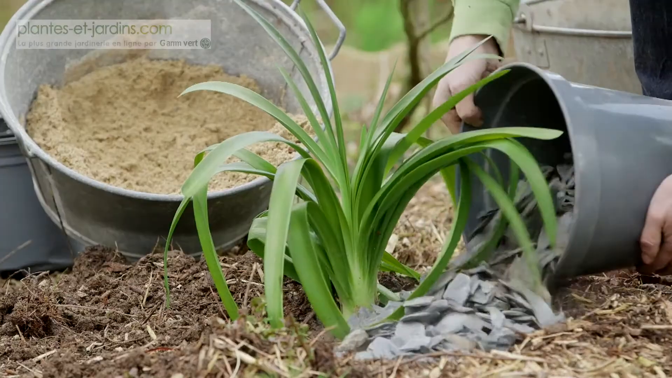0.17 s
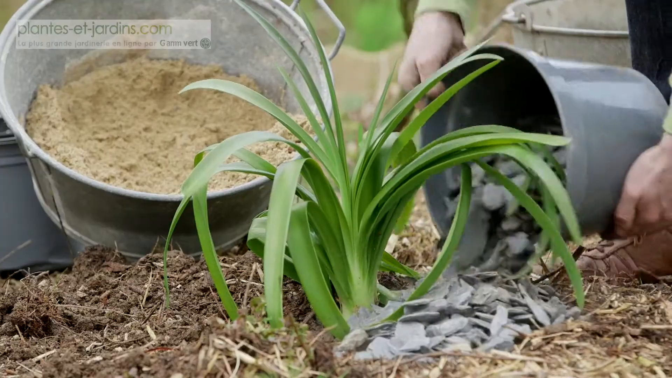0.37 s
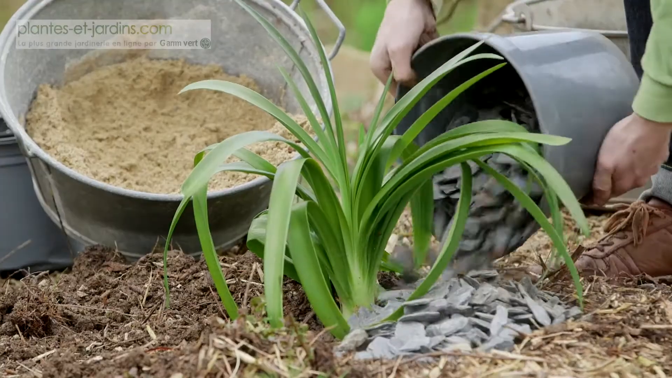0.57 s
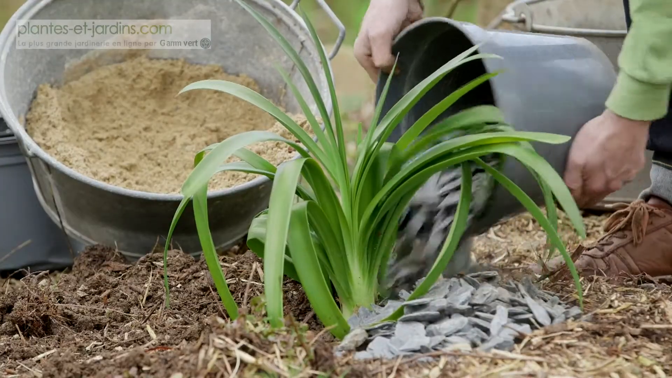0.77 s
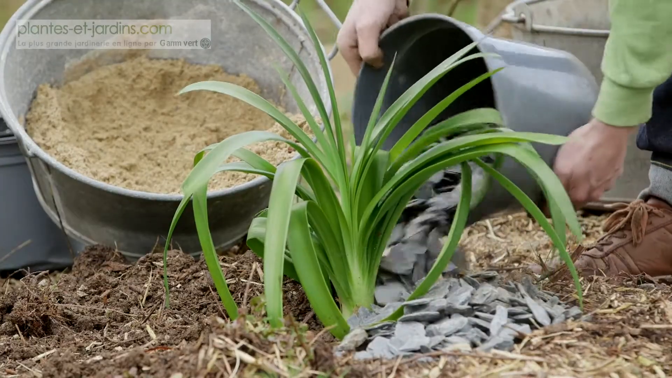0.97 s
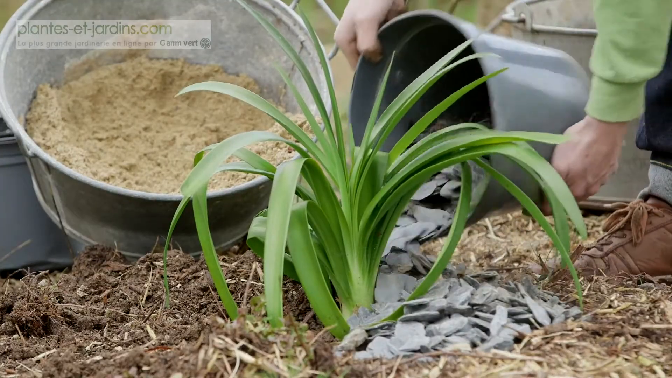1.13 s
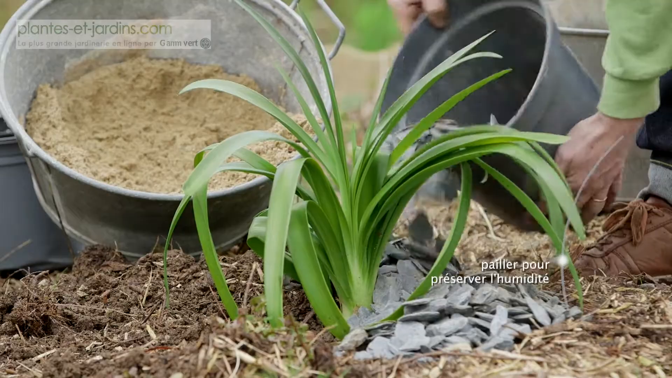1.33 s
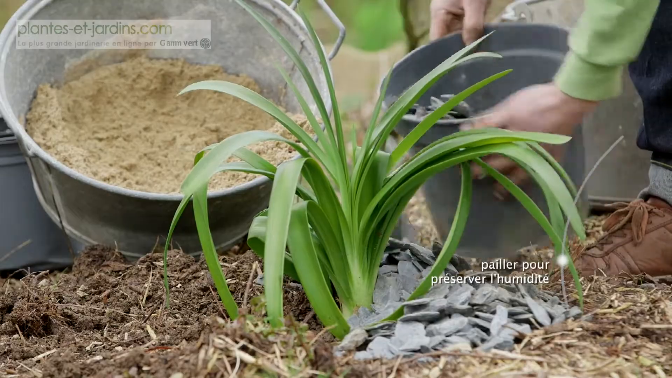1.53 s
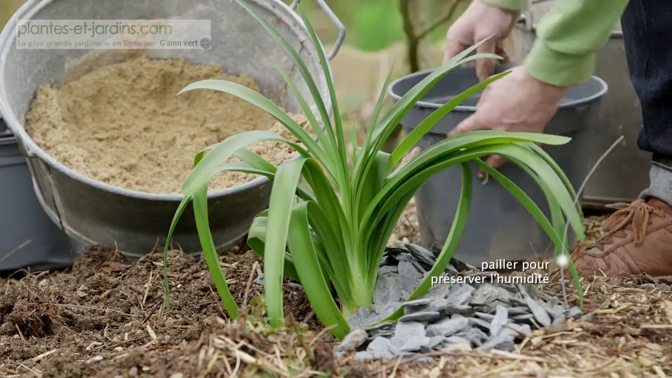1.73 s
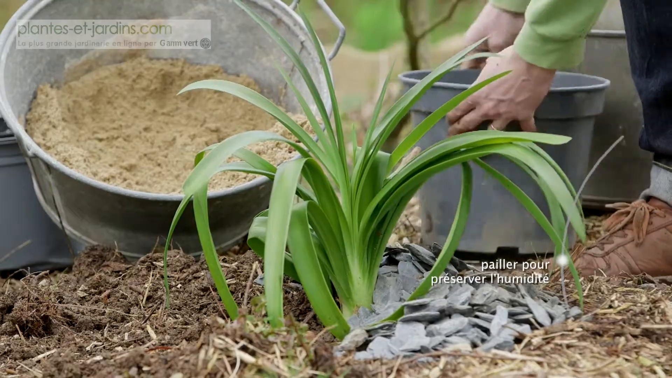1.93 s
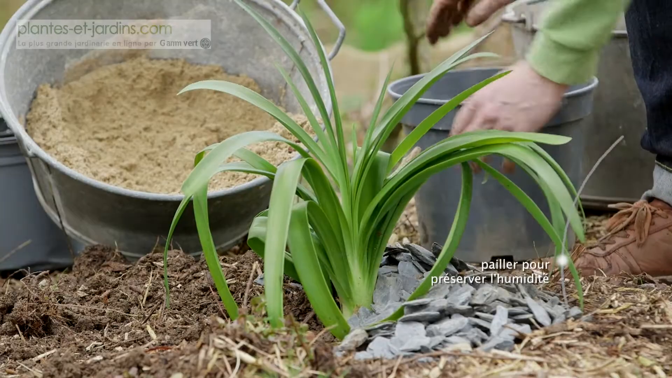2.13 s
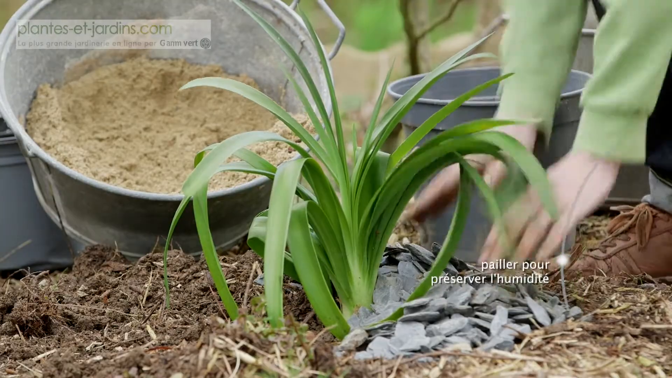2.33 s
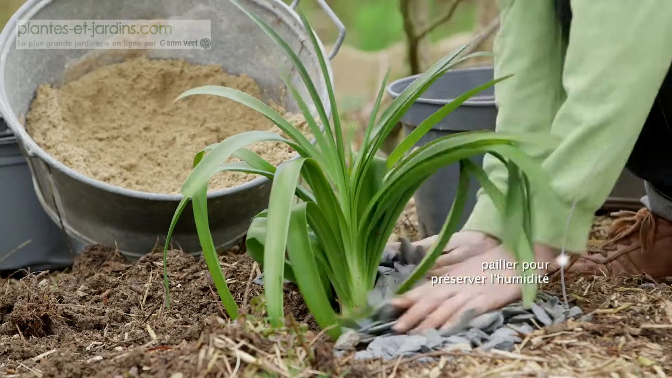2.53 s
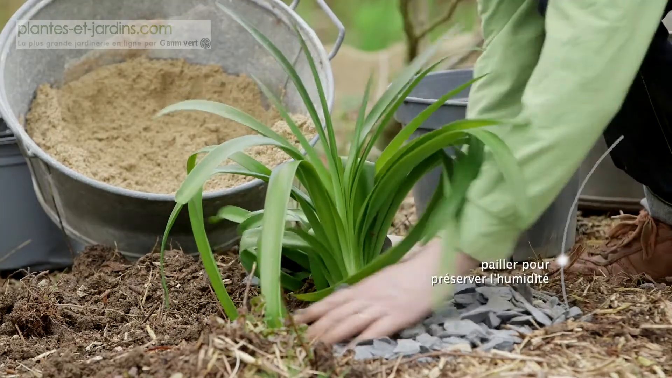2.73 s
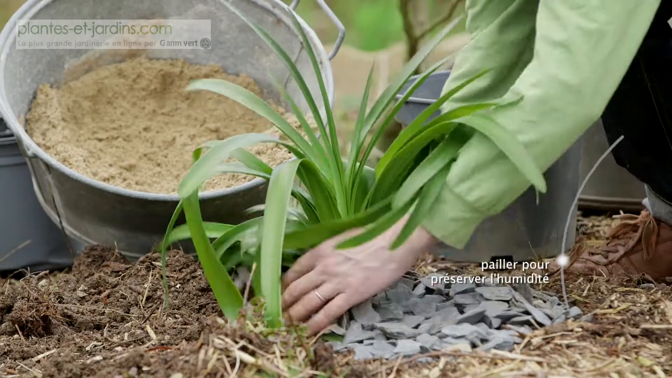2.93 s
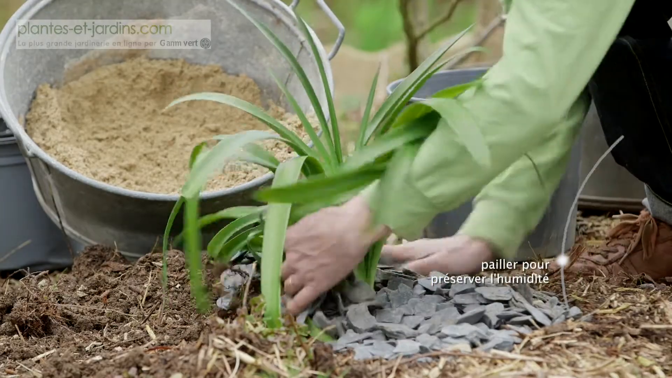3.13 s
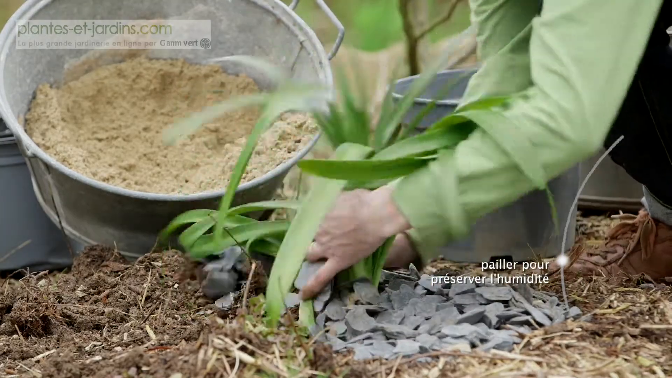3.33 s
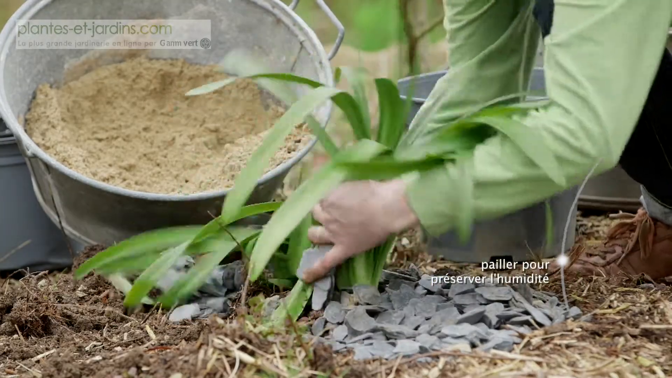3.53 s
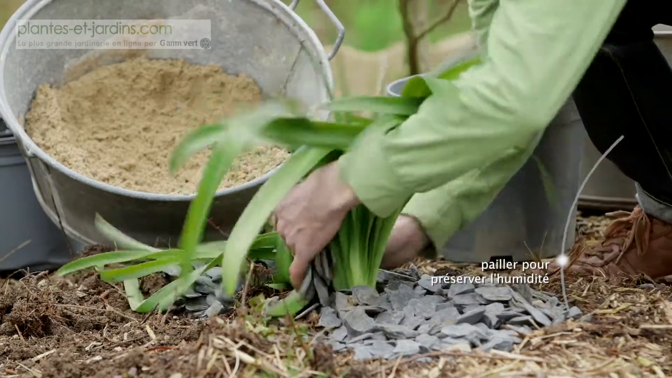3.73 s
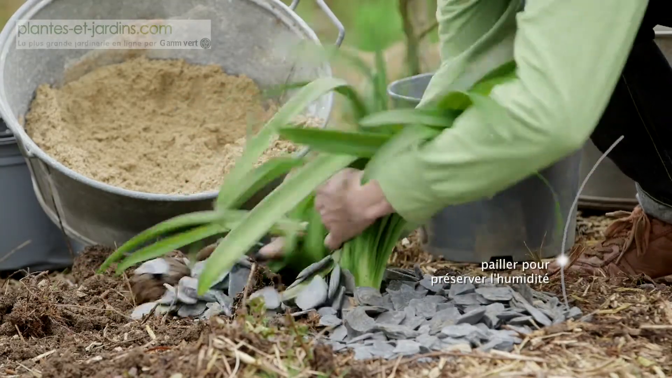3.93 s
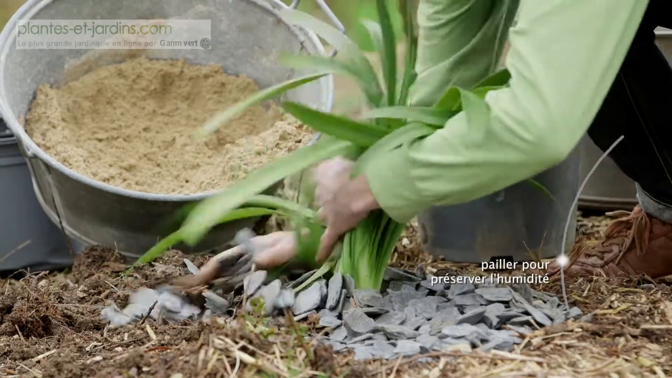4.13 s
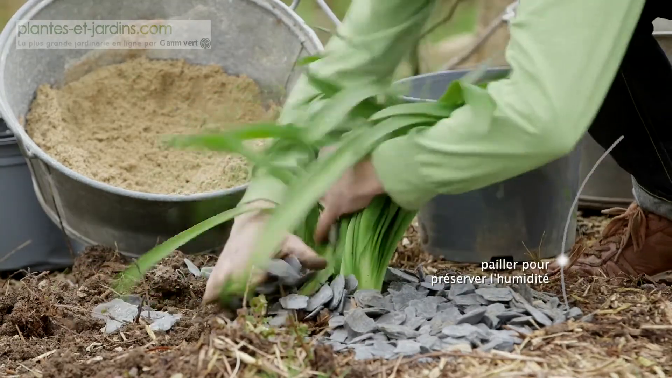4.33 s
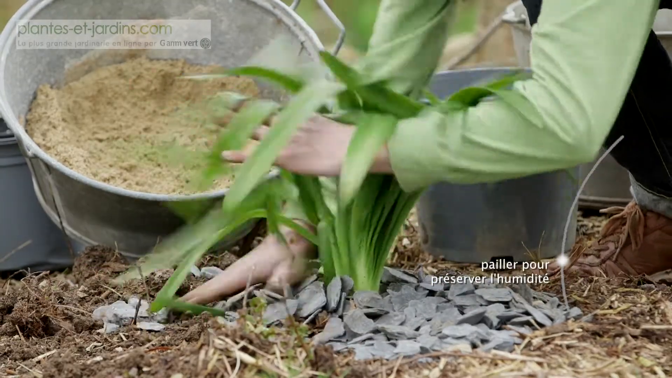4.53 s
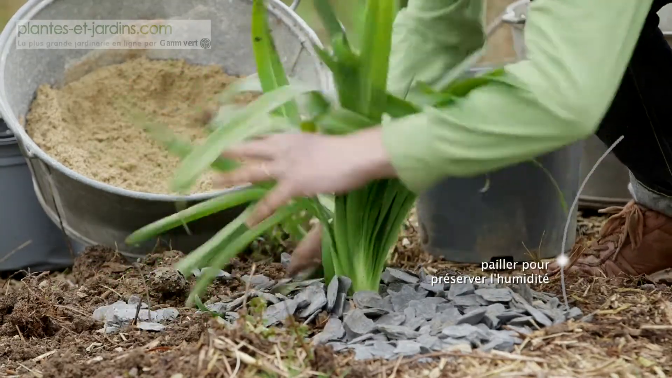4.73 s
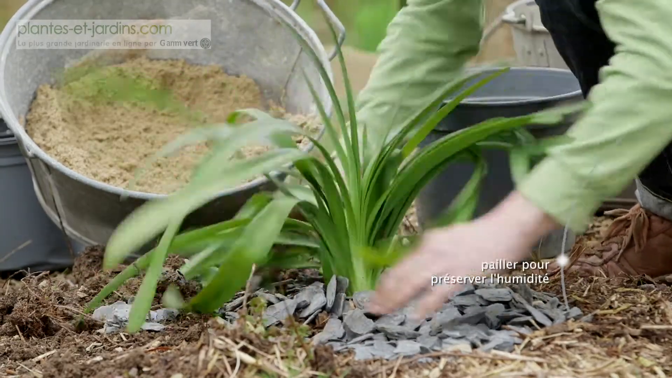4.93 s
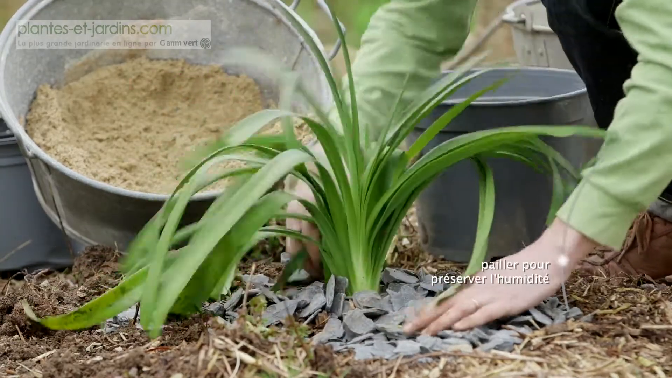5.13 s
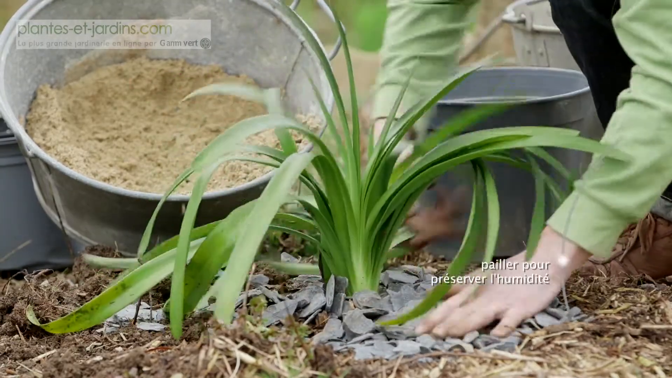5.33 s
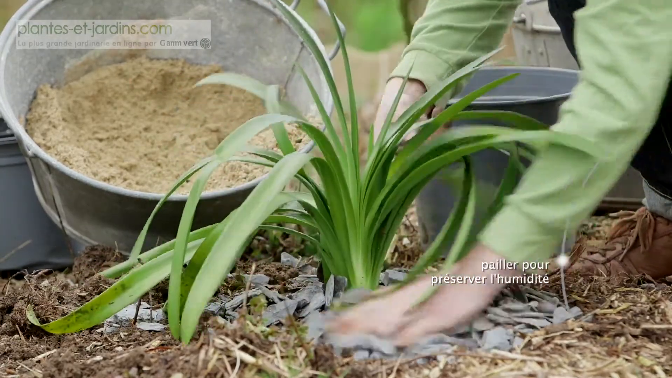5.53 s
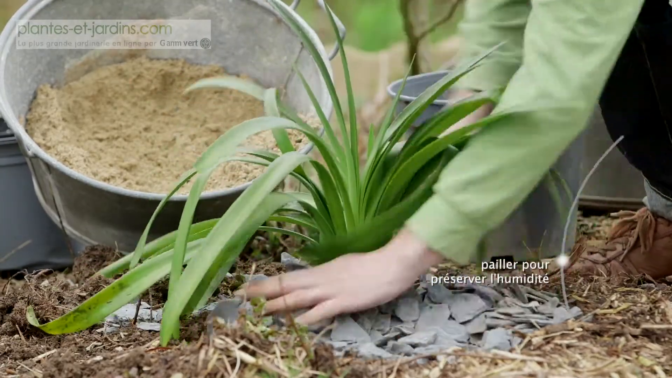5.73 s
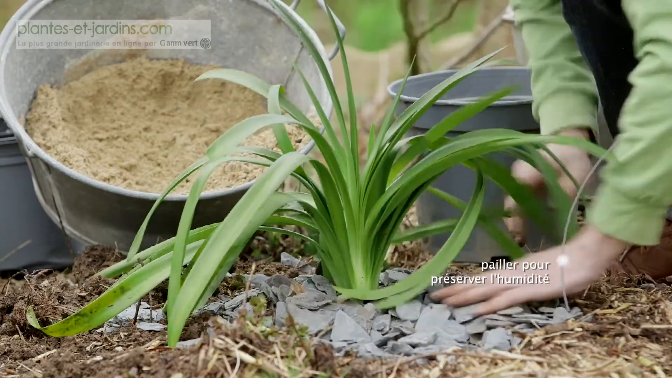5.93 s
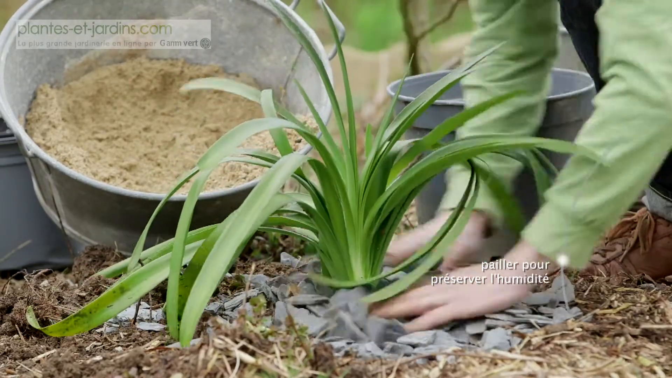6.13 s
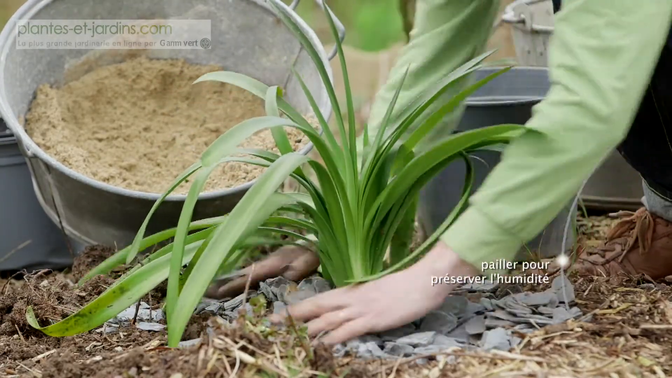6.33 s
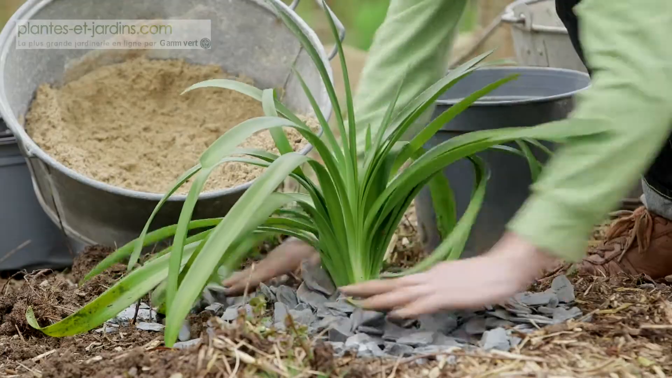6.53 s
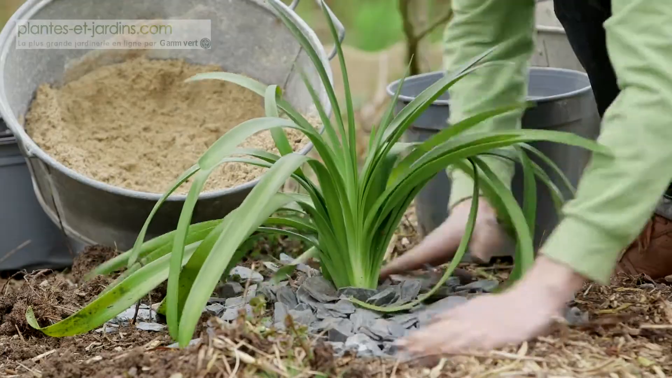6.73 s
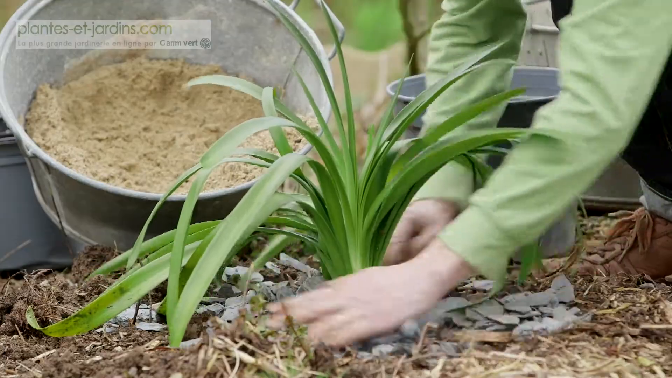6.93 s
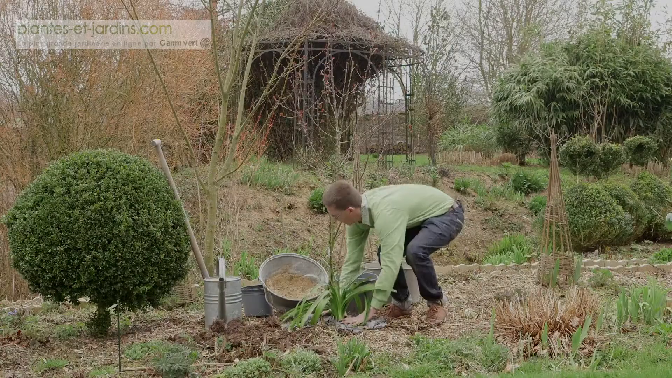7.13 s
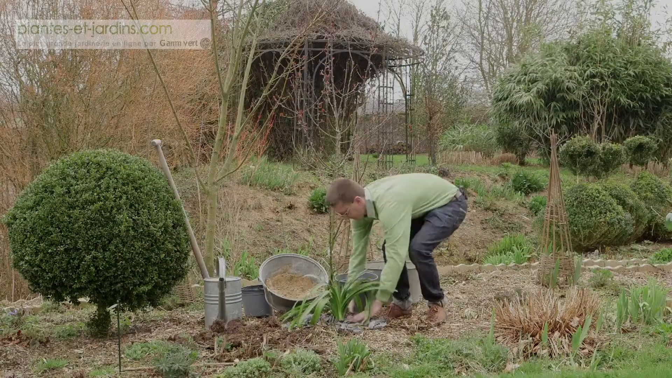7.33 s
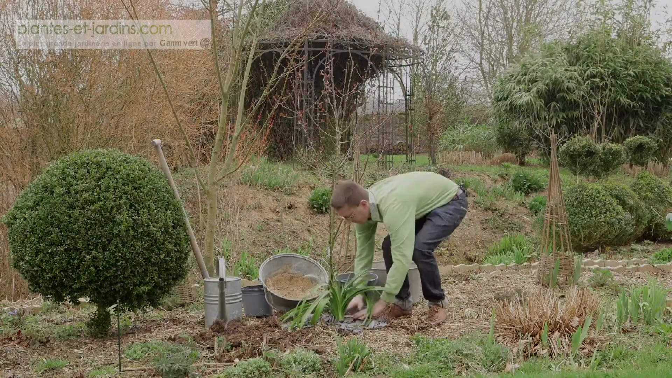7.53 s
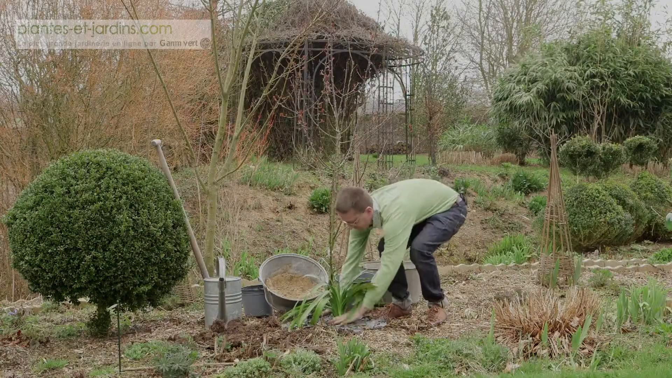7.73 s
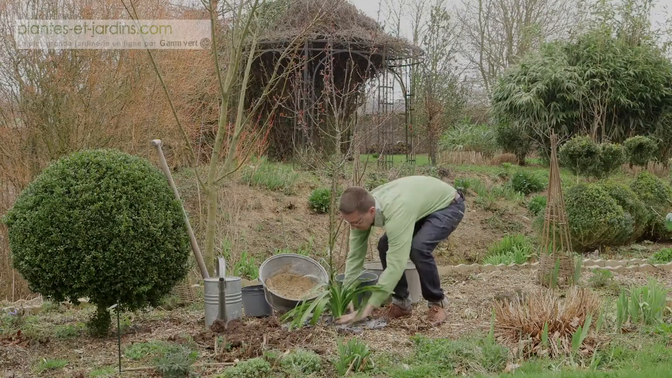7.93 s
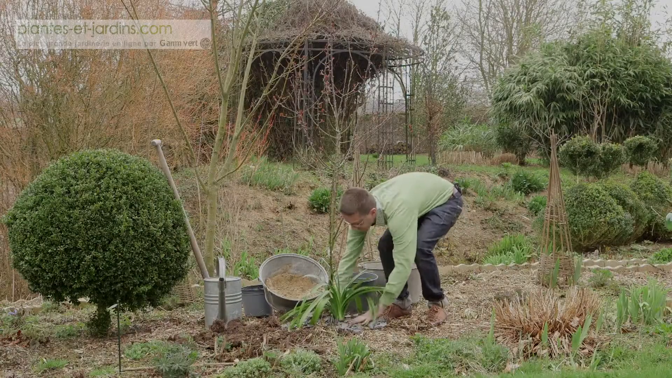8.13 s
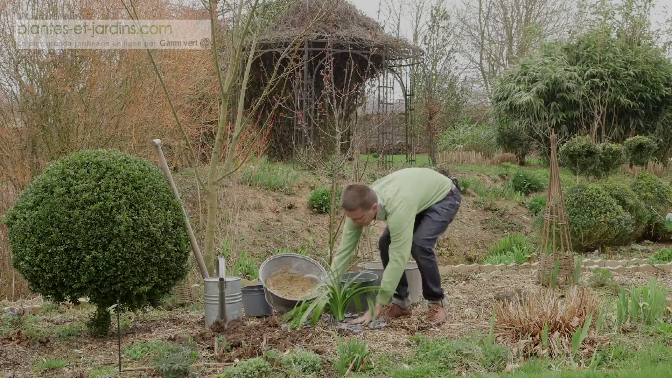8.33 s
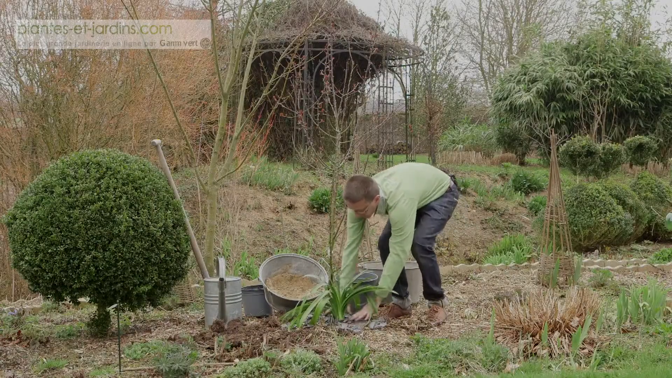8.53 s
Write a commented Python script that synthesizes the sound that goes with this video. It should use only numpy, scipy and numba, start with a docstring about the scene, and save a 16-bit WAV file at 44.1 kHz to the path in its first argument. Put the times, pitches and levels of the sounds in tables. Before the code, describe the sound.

Slate chips slide out of a plastic bucket in quick shakes, drumming on its wall and clattering onto a heap on the soil. The last ones rattle back with hollow knocks as the bucket is set down. Hands then sweep and pat the chips in short, uneven strokes, with gritty scrapes, thin clinks and soft thuds. It is all heard close up in quiet outdoor air, without echo.

```python
"""Slate chips slide out of a plastic bucket onto garden soil, drumming on its wall and clattering on
the heap; the last ones rattle back as it is set down. Two hands then sweep and pat the chips round a
plant: grit scrapes, flakes click and ring, the ground thuds. Random impacts drive the bucket's modes;
chip collisions are noise cracks plus decaying sines. Heard close up in quiet open air, with no room."""
import sys
import numpy as np
from scipy import signal
from scipy.fft import rfft, irfft
from scipy.io import wavfile
from scipy.ndimage import uniform_filter1d
from numba import njit

SR = 44100
rng = np.random.default_rng(int(sys.argv[2]) if len(sys.argv) > 2 else 0)


def generate_wav(sig):
    """Save sig (samples, or channels by samples) to the path in sys.argv[1] as 16-bit PCM at SR."""
    pcm = np.round(np.clip(np.atleast_2d(sig).T, -1, 1) * 32767).astype(np.int16)
    wavfile.write(sys.argv[1], SR, pcm)


N = 382523
T = np.arange(N) / SR
UPRIGHT_S = 1.55  # bucket goes from tipped to upright

# Modes of the tipped bucket. Each row: centre in Hz, width in Hz, gain in dB.
TIPPED_MODES = [(483, 86, 3.5), (355, 43, -13), (600, 220, 1.5), (943, 99, 9.5), (1150, 150, -4.5),
                (1380, 54, 4.5), (1830, 300, -32)]
# Modes of the upright bucket, struck on its floor. Each row: centre in Hz, width in Hz, gain in dB.
UPRIGHT_MODES = [(481, 68, 5), (785, 380, -5), (1050, 320, 1.5), (1400, 440, -1), (1750, 120, -14),
                 (2420, 880, -16)]


def pour():
    """Chips drum on the bucket and clatter onto the heap, where hard landings tick and clink."""
    # One batch per shake. Each row: start in s, length in s, settling t60 in s, drum in dB, chips in dB.
    slides = [(-0.03, 0.11, 0.84, -24.5, -22.5), (0.114, 0.16, 0.61, -27.5, -32.5),
              (0.317, 0.04, 0.092, -25, -31.5), (0.427, 0.029, 0.4, -30.5, -32),
              (0.523, 0.067, 0.54, -24.5, -36.5), (0.591, 0.089, 0.52, -20, -32.5),
              (0.724, 0.13, 0.13, -25.5, -31.5), (0.838, .15, 0.5, -26.5, -26.5),
              (1.029, 0.11, 0.51, -29, -35), (1.117, 0.069, 0.5, -22.5, -26.5),
              (1.239, 0.11, 0.38, -27, -29.5), (1.367, .06, .4, -52, -29), (1.431, 0.064, 0.31, -51, -29.5),
              (1.581, 0.05, 0.56, -27.5, -29), (1.652, 0.044, 0.062, -23.5, -25),
              (1.708, 0.068, .3, -29, -26), (1.768, 0.12, 0.46, -22.5, -19), (1.98, 0.12, 0.41, -61, -37.5),
              (2.247, 0.043, 1, -52.5, -49)]
    # Spectrum of falling chips. Each row: frequency in Hz, gain in dB.
    pour_eq = [(60, -9), (200, 0.5), (800, 9.5), (2500, 2.5), (4500, 0.5), (7000, -0.5), (11500, -5),
               (13500, -9), (16000, -19)]
    start_s, length_s, settle_s, drum_db, chips_db = np.transpose(slides)
    powers = np.array([motion(s, held_s, attack_s=.038, t60_s=t60_s) ** 2
                       for s, held_s, t60_s in zip(start_s, length_s, settle_s)])
    force = contacts(per_s=450, spread_db=-1.5)
    drum = steady(np.where(T < UPRIGHT_S, bucket(force, TIPPED_MODES), bucket(force, UPRIGHT_MODES)))
    rush = clatter(pour_eq, per_s=710, spread_db=2.5, crack_t60_s=.025, ring_s=.016, ring_db=-7)
    ticks = clatter(pour_eq, per_s=130, spread_db=2.5, crack_t60_s=.008, ring_s=.012, ring_db=-2)
    flakes = clinks(per_s=110, low_hz=3000, high_hz=12600, mean_t60_s=.028)
    chips = .75 * steady(rush) + .55 * steady(ticks) + .33 * steady(flakes, size=9000)
    return drum * overlap(powers, drum_db) + chips * overlap(powers, chips_db)


def knocks():
    """Heavy chips land on the bucket and chatter briefly."""
    # Each row: start in s, peak in dB.
    landings = [(0.144, -10.5), (0.256, -17), (0.274, -13), (0.363, -13), (0.408, -10.5), (0.43, -16.5),
                (0.556, -17), (0.643, -10), (0.703, -13), (0.762, -10), (0.835, -8.5), (0.974, -11),
                (1.053, -20), (1.168, -14), (1.183, -14), (1.337, -19), (1.577, -9.5), (1.637, -9.5),
                (1.643, -13), (1.684, -12), (1.698, -10.5), (1.723, -11.5), (1.75, -9), (1.795, -5),
                (1.864, -11), (1.882, -6), (2.1, -36), (2.125, -19.5), (2.18, -32)]
    out = np.zeros(N)
    chatter = fade(t60_s=.02)
    for start_s, peak_db in landings:
        modes = TIPPED_MODES if start_s < UPRIGHT_S else UPRIGHT_MODES
        add(out, start_s, bucket(chatter * rng.standard_normal(len(chatter)), modes), peak_db)
    return out


def bucket(force, modes):
    """The plastic wall and the air inside resonate under a force."""
    body = sum(undb(db) * resonate(force, hz, width_hz) for hz, width_hz, db in modes)
    return cut(cut(body, 276, "high"), 2430, "low")


def sweep():
    """Hands drag the chips over gritty soil and jostle them against each other."""
    # Hand strokes. Each row: start in s, length in s, grit in dB, chips in dB, soil in dB re grit.
    strokes = [(2.422, .11, -35.5, -34.5, -15), (2.528, 0.27, -34.5, -33.5, -12.5),
               (2.803, 0.084, -36, -34.5, -13), (2.89, 0.23, -44, -37.5, -6.5),
               (3.09, 0.11, -42.5, -34, -12), (3.191, 0.097, -34.5, -29, -9.5),
               (3.308, 0.18, -42, -42.5, -4), (3.5, 0.25, -46.5, -38, -5.5),
               (3.787, 0.25, -43.5, -40.5, -5.5), (4.051, 0.14, -44.5, -39, -4.5),
               (4.189, 0.091, -45.5, -42, -2), (4.273, 0.22, -48, -45, -2.5),
               (4.447, 0.085, -41.5, -36.5, -3.5), (4.558, 0.29, -50, -44.5, -2.5),
               (4.897, 0.28, -52.5, -51, 0), (5.126, 0.092, -44, -49, -16), (5.26, 0.12, -48.5, -46.5, -15),
               (5.422, 0.1, -40, -42, -17), (5.536, .1, -33, -35, -16.5), (5.646, 0.079, -36.5, -39, -12),
               (5.81, 0.076, -52.5, -60, -12), (5.952, 0.078, -41, -40.5, -10),
               (6.057, 0.094, -37, -36.5, -11), (6.089, 0.13, -33.5, -27, -9.5),
               (6.242, 0.24, -41.5, -37.5, -9.5), (6.524, 0.069, -44, -38.5, -10),
               (6.641, 0.16, -39.5, -35.5, -11.5), (6.8, .145, -39, -33, -14.5),
               (6.95, 0.15, -44.5, -44, -22), (7.095, .06, -36, -48, -11), (7.208, 0.2, -46.5, -45.5, -14),
               (7.388, 0.12, -41, -35, -11), (7.47, 0.02, -32.5, -26.5, -14), (7.555, 0.23, -73, -59, -9),
               (7.722, 0.081, -43.5, -40.5, -19), (7.804, 0.14, -47.5, -55, -10),
               (7.918, 0.09, -43.5, -44.5, -13.5), (8.071, .16, -43, -42, -9.5),
               (8.259, 0.088, -50, -43, -15), (8.436, 0.087, -51.5, -53, -21), (8.629, .07, -49, -57, -17)]
    # Spectrum of scraping grit. Each row: frequency in Hz, gain in dB.
    grit_eq = [(60, -9), (200, -14.5), (450, -13.5), (700, -1.5), (1000, 2.5), (1400, 1.5), (2300, -1),
               (4000, -3.5), (6000, -6), (16000, -20)]
    # Spectrum of soil rumble. Each row: frequency in Hz, gain in dB.
    soil_eq = [(25, -13), (70, 2.5), (140, -2), (300, -4.5), (480, -1.5), (750, 2.5), (1200, -7),
               (2500, -5.5), (16000, -49)]
    start_s, length_s, grit_db, chips_db, soil_db = np.transpose(strokes)
    powers = np.array([motion(s, held_s, attack_s=.047, t60_s=.29, sag_db_per_s=3) ** 2
                       for s, held_s in zip(start_s, length_s)])
    dig_db = soil_db @ powers / (powers.sum(axis=0) + 1e-18)  # deeper strokes rumble more
    dig = undb(dig_db)
    grit = steady(clatter(grit_eq, per_s=600, spread_db=2.5, crack_t60_s=.016, ring_s=.0044, ring_db=-15))
    soil = steady(colour(contacts(per_s=900, spread_db=3.5), soil_eq))
    # A flat palm on the dry top layer rasps.
    rasp = np.clip(-.12 * (dig_db + 8), 0, 3) * resonate(grit, 1850, 2000)
    ground = (steady(grit + rasp) + soil * dig) * overlap(powers, grit_db)
    chips = jostle() * catching(dig) * overlap(powers, chips_db)
    moved = ground + chips
    # Buried chips lose their brighter ring.
    smothered = np.clip(1.4 * dig, 0, .6) * resonate(moved, 5600, 2400)
    return moved - smothered


def jostle():
    """Moving chips near unit level: faces rub, edges tick, flakes clink."""
    # Spectrum of slate on slate. Each row: frequency in Hz, gain in dB.
    chip_eq = [(200, -14), (1500, -9.5), (3000, -4), (4500, -0.5), (6000, 0.5), (8500, -2), (11500, -1.5),
               (13200, -12), (16000, -22)]
    rub = clatter(chip_eq, per_s=900, spread_db=5, crack_t60_s=.022, ring_s=.0052, ring_db=-2)
    ticks = clatter(chip_eq, per_s=70, spread_db=2.5, crack_t60_s=.007, ring_s=.006, ring_db=-3)
    flakes = clinks(per_s=55, low_hz=7200, high_hz=12600, mean_t60_s=.026)
    return .75 * steady(rub) + .5 * steady(ticks, size=9000) + .45 * steady(flakes, size=9000)


def catching(dig, depth_db=3.5, points=300):
    """Wandering gain: chips catch and slip, more so as the fingers dig deeper."""
    slip = np.interp(T, np.linspace(0, T[-1], points), np.clip(rng.standard_normal(points), -2, 1))
    return undb(depth_db * np.minimum(dig, 1) * slip)


def clatter(eq, per_s, spread_db, crack_t60_s, ring_s, ring_db):
    """Chip collisions: each a gritty crack plus five random flake modes, all filtered by eq."""
    hits = contacts(per_s, spread_db)
    energy = signal.fftconvolve(hits ** 2, fade(crack_t60_s) ** 2)[:N]
    crack = np.sqrt(np.abs(energy)) * rng.standard_normal(N)
    onsets = np.repeat(np.flatnonzero(hits), 5)
    pitch, damping, strength = rng.random((len(onsets), 3)).T
    t60_s = ring_s / (.25 + damping)  # neighbours damp most flakes; a few ring on
    modes = damped_sines(onsets, 1500 + 13500 * pitch, t60_s, hits[onsets] * strength)
    return colour(crack / crack.std() + undb(ring_db) * modes / modes.std(), eq)


def clinks(per_s, low_hz, high_hz, mean_t60_s):
    """Loose flakes ring on a close pair of modes, then rebound on the lower one."""
    hits = contacts(per_s, spread_db=2.5)
    onsets = np.flatnonzero(hits)
    pitch, damping, bounce = rng.random((len(onsets), 3)).T
    hz = low_hz + (high_hz - low_hz) * pitch
    t60_s = mean_t60_s * (.5 + damping)
    rebounds = onsets + (bounce * t60_s * SR / 2).astype(np.int64)
    lower = damped_sines(onsets, hz, t60_s, hits[onsets])
    upper = damped_sines(onsets, hz * (1 + .06 * bounce), t60_s / 2, hits[onsets])
    return lower + upper + damped_sines(rebounds, hz, t60_s, hits[onsets] / 2)


def clicks():
    """Chip snaps on chip: a crack round the flake's main mode, a short ring, a clack of the heap."""
    # Each row: start in s, peak in dB, main mode in Hz, clack gain in dB before a 5 dB lift.
    snaps = [(1.392, -14, 11000, -4), (1.4661, -20, 7250, -8), (1.481, -6, 8400, -10),
             (1.506, -4, 10300, -8.5), (1.531, -14, 9150, -25), (1.578, -10, 2470, -7),
             (1.605, -12, 7140, 12), (1.627, -9, 8700, 4), (1.696, -8, 11200, -15), (1.7311, -7, 4970, 3),
             (1.7492, -6.5, 5460, 8), (2.0753, -10.5, 7160, -9), (2.1057, -18.5, 4540, -19),
             (2.2127, -22, 3200, -10), (2.435, -13.5, 6000, 1), (2.452, -12.5, 2800, -21),
             (2.4874, -14, 9800, -21), (2.8752, -19, 4370, 15), (2.923, -14.5, 9500, -15),
             (2.9472, -17.5, 8600, 3), (3.1287, -11, 8350, -2), (3.187, -14.5, 8500, -20),
             (3.29, -17.5, 11500, -11), (3.6896, -17.5, 8160, -19), (3.783, -22.5, 3910, -16),
             (3.806, -23, 9900, -9), (3.8543, -22.5, 4300, -12), (4.115, -17.5, 10700, -6),
             (4.461, -13.5, 2610, 3), (4.472, -16.5, 9800, -16), (4.5013, -14.5, 9900, -5),
             (4.526, -15.5, 10100, -10), (4.6254, -29, 6800, -11), (4.828, -28, 2980, 17),
             (4.91, -24, 5260, 1), (4.928, -20.5, 8650, 4), (4.9669, -24.5, 3950, 8),
             (5.058, -21.5, 9400, -10), (5.0732, -22, 8600, -1), (5.101, -24, 4130, -12),
             (5.1713, -19.5, 2650, 14), (5.2179, -16.5, 2560, 2), (5.2964, -23, 7100, -1),
             (5.3048, -19, 10800, -3), (5.3328, -22.5, 3580, 17), (5.361, -23.5, 8000, -13),
             (5.4855, -18.5, 3770, -8), (5.633, -14, 8100, -18), (5.7164, -21.5, 11400, -7),
             (5.8353, -26.5, 2800, 25), (5.8649, -23.5, 7030, 5), (6.307, -12, 7940, 0),
             (6.344, -11.5, 10300, -3), (6.3738, -14.5, 7900, -4), (6.4795, -13, 9050, -3),
             (6.549, -25.5, 9500, -10), (6.581, -17, 9900, -17), (6.657, -17.5, 8980, -1),
             (6.8869, -14, 9600, -11), (6.9018, -16.5, 7340, -6), (6.938, -8.5, 11400, -11),
             (6.959, -16.5, 7100, -3), (7.1368, -19, 6460, 0), (7.239, -20, 8600, 5),
             (7.4028, -17.5, 10600, -15.5), (7.4501, -13, 10700, -14), (7.506, -10.5, 3200, 3),
             (7.5226, -14.5, 8000, -13), (7.6007, -23.5, 9200, -34), (7.699, -29.5, 3950, -17),
             (7.7296, -25.5, 4800, -6), (7.999, -21, 8500, -9), (8.1497, -19, 8700, -19),
             (8.2537, -20, 9400, -16), (8.527, -27.5, 5540, -4), (8.577, -25.5, 6650, -3),
             (8.593, -23, 7700, -4.5), (8.6376, -27.5, 7360, -2)]
    out = np.zeros(N)
    contact = fade(t60_s=.004) + .8 * fade(t60_s=.017)
    for start_s, peak_db, hz, clack_db in snaps:
        force = contact * rng.standard_normal(len(contact))
        flake = resonate(force, hz, width_hz=4200) + 2 * resonate(force, hz, width_hz=430)
        clack = undb(clack_db + 5) * resonate(force, 930, width_hz=3300)
        add(out, start_s, cut(flake + clack, 10000, "low"), peak_db)
    return out


def thuds():
    """Chips and palms press into soft soil: one dead swing, and the ground gives a little."""
    # Each row: start in s, peak in dB, cut-off in Hz (lower is softer).
    blows = [(1.507, -15, 700), (1.606, -18, 700), (1.684, -15, 700), (1.701, -16, 400), (1.727, -25, 400),
             (1.75, -21, 700), (2.024, -28, 700), (2.436, -28, 600), (2.453, -23, 700), (2.488, -23.5, 700),
             (2.923, -19, 800), (2.941, -19.5, 800), (3.13, -30, 400), (3.188, -27.5, 400),
             (3.735, -32.5, 600), (3.805, -22.5, 815), (4.137, -31, 700), (5.718, -25, 600),
             (6.112, -29, 600), (6.194, -26, 600), (6.311, -24, 700), (6.354, -22.5, 700),
             (6.48, -22.5, 700), (6.888, -22, 600), (6.939, -19, 600), (6.986, -26, 600),
             (7.113, -26.5, 597), (7.241, -24, 600), (7.403, -16.5, 800), (7.45, -18, 800),
             (7.509, -24, 700)]
    out = np.zeros(N)
    for start_s, peak_db, cutoff_hz in blows:
        push = cut(-fade(t60_s=.0019), cutoff_hz, "low")
        give = undb(-4.5) * resonate(push, 91, width_hz=61)
        add(out, start_s, cut(push, 95, "high") + give, peak_db)
    return out


def rings(size=8192):
    """One mode outlasts a blow, from dull bumps to thin flakes."""
    # Each row: start in s, peak in dB, pitch in Hz, t60 in s.
    free_modes = [(2.576, -31.5, 597, 0.066), (2.789, -27, 9200, 0.022), (3.156, -24, 8400, 0.05),
                  (3.188, -22, 8650, 0.028), (3.805, -21.5, 10000, 0.022), (4.163, -25.5, 10050, .03),
                  (4.484, -22, 10100, 0.03), (5.305, -29, 10800, .03), (5.387, -29.5, 112, 0.029),
                  (7.196, -37, 10300, 0.021), (7.256, -27.5, 8800, 0.022), (7.273, -34, 140, 0.016),
                  (7.968, -32.5, 710, 0.011), (8.593, -21.5, 860, 0.012)]
    out = np.zeros(N)
    for start_s, peak_db, hz, t60_s in free_modes:
        envelope = fade(t60_s, size) - fade(3 / hz, size)  # rises within three cycles
        add(out, start_s, np.sin(2 * np.pi * hz * T[:size]) * envelope, peak_db)
    return out


def air(level_db=-54.5):
    """Quiet garden air: low noise that slowly swells and ebbs."""
    # Each row: frequency in Hz, gain in dB.
    air_eq = [(20, -12), (45, -0.5), (100, 4), (200, -0.5), (500, -5.5), (1200, -3.5), (3000, -17),
              (10000, -25), (16000, -41)]
    swell_db = 1.5 * np.interp(T, np.linspace(0, T[-1], 24), rng.standard_normal(24))
    return steady(colour(rng.standard_normal(N), air_eq)) * undb(level_db + swell_db)


def contacts(per_s, spread_db):
    """Random impacts; a few are harder (spread_db > 0) or lighter (< 0) than the rest."""
    hit = rng.random(N) < per_s / SR
    sign = rng.choice([-1, 1], N)
    return hit * sign * undb(spread_db * np.minimum(rng.exponential(size=N), 4))


def motion(start_s, length_s, attack_s, t60_s, sag_db_per_s=0):
    """Envelope: chips gather speed, keep moving while pushed, then settle."""
    age_s = T[T >= start_s] - start_s
    swell = np.sin(np.pi / 2 * np.minimum(age_s / attack_s, 1)) ** 2
    fall_db = sag_db_per_s * age_s + 60 * np.maximum(age_s - length_s, 0) / t60_s
    return np.pad(swell * undb(-np.minimum(fall_db, 120)), (N - len(age_s), 0))


def overlap(powers, levels_db):
    """Joint amplitude of overlapping motions: powers add."""
    return np.sqrt(undb(levels_db) ** 2 @ powers)


@njit
def damped_sines(onsets, hz, t60_s, amplitude):
    """Sum of decaying sines; onsets in samples."""
    out = np.zeros(N)
    for k in range(len(onsets)):
        pole = np.exp((2j * np.pi * hz[k] - np.log(1000) / t60_s[k]) / SR)
        phasor = amplitude[k] + 0j
        for i in range(onsets[k], min(N, onsets[k] + int(t60_s[k] * SR))):
            phasor *= pole
            out[i] += phasor.imag
    return out


def colour(x, eq, size=8192):
    """Minimum-phase filter through (Hz, dB) points; attacks stay sharp."""
    hz, db = np.transpose(eq)
    bins_hz = np.maximum(np.fft.rfftfreq(size, 1 / SR), 1)
    gain = undb(np.interp(np.log(bins_hz), np.log(hz), db))
    cepstrum = irfft(np.log(gain), size)
    cepstrum[1:size // 2] *= 2
    cepstrum[size // 2 + 1:] = 0
    impulse_response = irfft(np.exp(rfft(cepstrum)), size)
    return signal.oaconvolve(x, impulse_response)[:N]


def resonate(x, hz, width_hz):
    """One resonance, gain 1 at its centre."""
    return signal.lfilter(*signal.iirpeak(hz, hz / width_hz, fs=SR), x)


def cut(x, hz, kind):
    """Second-order low-pass or high-pass."""
    return signal.sosfilt(signal.butter(2, hz, kind, fs=SR, output="sos"), x)


def steady(x, size=3500):
    """Unit running RMS, smoothed over size samples; single grains still stand out."""
    return x / np.sqrt(uniform_filter1d(uniform_filter1d(x * x, size), size) + 1e-12)


def fade(t60_s, size=4096):
    """Exponential decay."""
    return np.exp(-np.log(1000) * T[:size] / t60_s)


def add(out, start_s, sound, peak_db):
    """Mix a sound in at the given peak level."""
    i = int(start_s * SR)
    out[i:i + len(sound)] += (sound * undb(peak_db) / np.abs(sound).max())[:N - i]


def undb(db):
    """Decibels to gain."""
    return np.exp(np.asarray(db) * (np.log(10) / 20))


def scene():
    """All sources in one channel."""
    return (air() + knocks() + clicks() + thuds() + rings() + pour() + sweep())[None]


def record(dry):
    """Round the highest peaks and cut the top treble."""
    ceiling, top_hz = .58, 16000
    rounded = dry / (1 + (dry / ceiling) ** 4) ** .25
    return signal.sosfilt(signal.ellip(8, .2, 70, top_hz, fs=SR, output="sos"), rounded)


dry = scene()
out = record(dry)
generate_wav(out)
```